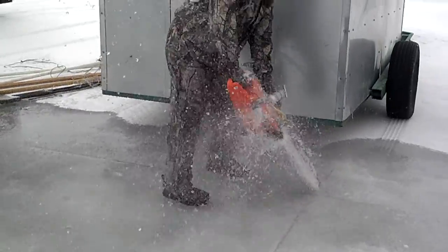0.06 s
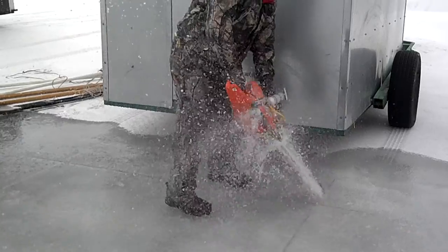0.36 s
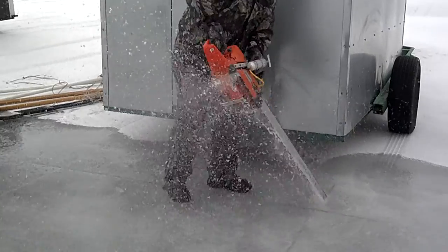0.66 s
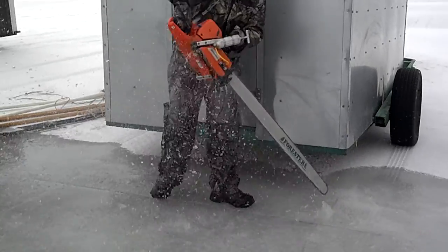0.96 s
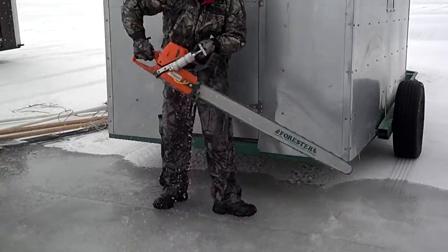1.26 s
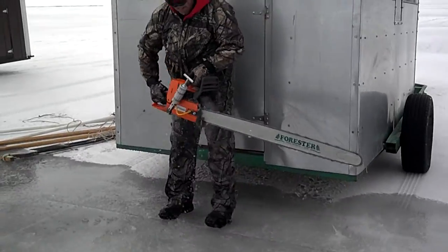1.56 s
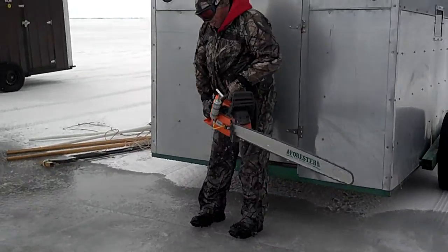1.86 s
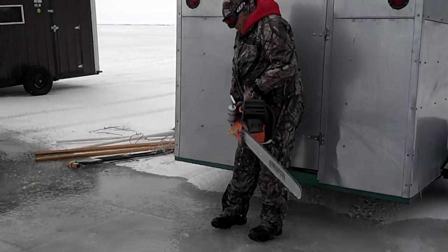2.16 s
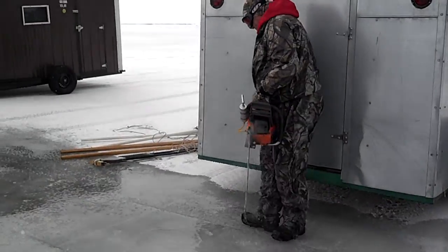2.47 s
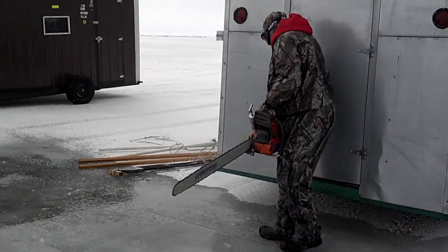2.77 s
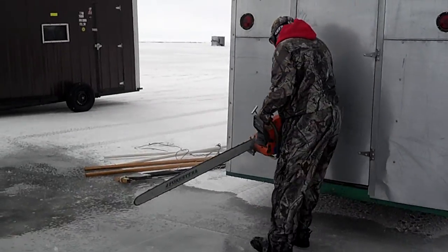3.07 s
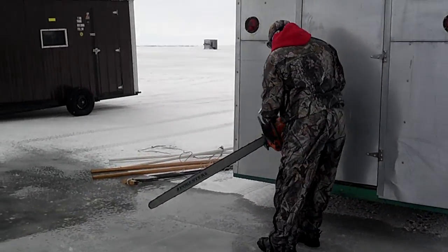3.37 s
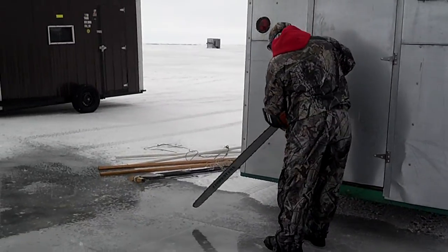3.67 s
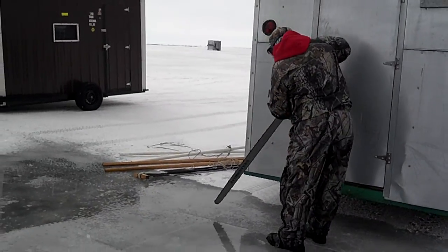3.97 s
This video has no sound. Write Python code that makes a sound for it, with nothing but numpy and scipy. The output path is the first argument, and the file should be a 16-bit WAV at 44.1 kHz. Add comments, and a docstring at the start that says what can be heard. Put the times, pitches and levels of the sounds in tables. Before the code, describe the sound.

A loud two-stroke chainsaw saws through ice, winds down and is revved in short bursts.

```python
"""A two-stroke chainsaw cuts lake ice at full throttle, is lifted out, coasts and is blipped five times.
Each firing cracks through the muffler with a puff of gas, over a clean low drone, and the engine bangs
as the throttle catches. The chain rattles, sings and clinks on its long bar and throws ice chips.
A trailer wall answers, and a pair of combs widens the stereo picture."""
import sys
import numpy as np
from scipy import signal
from scipy.fft import rfft, irfft, next_fast_len
from scipy.io import wavfile
from scipy.ndimage import uniform_filter1d, map_coordinates

SR = 44100
rng = np.random.default_rng(int(sys.argv[2]) if len(sys.argv) > 2 else 0)


def put_to_file(sound):
    """Save the sound as 16-bit audio at rate SR, in the file named by the first command-line argument."""
    columns = np.atleast_2d(sound).T  # one column per channel
    safe = np.clip(columns, -1, 1)
    whole_steps = np.round(safe * 32767)
    wavfile.write(sys.argv[1], SR, whole_steps.astype(np.int16))


N = 176400
TIME = np.arange(N) / SR


def engine_speed():
    """Turns per second: the crank races under throttle and runs down between blips."""
    # crank speed: t/s, f/Hz
    revs = [(0.0, 165.2), (0.14, 163.9), (0.34, 166.5), (0.59, 185.7), (0.65, 188.4), (0.68, 179.8),
            (0.79, 146), (0.99, 97.8), (1.08, 80.5), (1.16, 80.9), (1.25, 109.9), (1.31, 128.9),
            (1.45, 162.1), (1.5, 172), (1.66, 128.9), (1.68, 127.0), (1.8, 164.9), (1.9, 183.6),
            (1.95, 188.9), (1.98, 182.6), (2.08, 158.1), (2.23, 186.8), (2.31, 196.5), (2.33, 194.5),
            (2.54, 145.0), (2.66, 176.1), (2.78, 195.5), (2.81, 190.6), (2.88, 172.5), (3.16, 112.5),
            (3.23, 129.5), (3.36, 166.5), (3.4, 164.7), (3.61, 122.5), (3.71, 105.0), (3.88, 78.5),
            (4.0, 65)]
    return uniform_filter1d(curve(revs), size=900, mode="nearest") * (1 + 0.00084 * wobble(30.0))


def exhaust(speed, bark_hz=114, snarl_hz=195):
    """Firings crack through the muffler, whose nasal honk shifts as the saw is turned; gives tone, gas."""
    # throttle held in the cut: open/s, close/s, level/dB, roughness/0-1, rise/s, rasp/dB, honk/Hz, honk/dB
    cut = [(-0.23, 0.633, -4, 0.12, .01, -38, 1027, -7)]
    # throttle blips: same columns
    blips = [(1.158,1.487,-3.5,0.04,0.084,-2,950,6.5),(1.652,1.95,-2,0.09,0.045,-6,1034,1.5),(2.068,2.309,-1.5,0.15,0.083,0.5,720,-12),(2.535,2.782,-8,0.13,0.029,-4.5,1234,7.5),(3.16,3.325,-3,0.14,0.014,-12,625,-18)]
    # muffler colour nose down in the cut, held up at high revs, held up at low revs: f/Hz, level/dB
    cut_tone = [(300,-106),(495,-73),(535,-48.5),(660,-50.5),(830,-43.5),(1000,-48.5),(1170,-47),(1330,-75),(1500,-53.5),(1800,-60.5),(2300,-54.5),(3350,-55.5),(6000,-76),(12000,-111)]
    snarl_tone = [(60,-100),(350,-68),(430,-63),(540,-52.5),(750,-57),(880,-51),(1120,-50.5),(1320,-60.5),(1520,-54),(1900,-63),(2600,-54.5),(5200,-75),(9000,-109)]
    bark_tone = [(60,-100),(300,-55),(430,-59),(560,-45.5),(700,-44.5),(900,-46.5),(1100,-60.5),(1500,-56.5),(2300,-84),(4000,-53.5),(7000,-72.5)]
    snarl = np.clip((speed - bark_hz) / (snarl_hz - bark_hz), 0, 1)
    effort = rev_gain(speed, db_per_octave=10.5)
    fired, load, rasp = np.zeros((3, N))
    for spells, tones in ((cut, [(cut_tone, 1)]), (blips, [(snarl_tone, snarl), (bark_tone, 1 - snarl)])):
        for opens, closes, db, roughness, rise, rasp_db, honk_hz, honk_db in spells:
            gain, rough = throttle(opens, closes, db, roughness, rise)
            firings = pulses(speed, gain * effort, rough)
            voice = sum(coloured(firings * share, tone) for tone, share in tones)
            fired = fired + voice + amp(honk_db) * resonance(voice, honk_hz, width_hz=110)
            load += gain
            rasp += gain * amp(rasp_db - db)
    fired = fired + idling(speed, effort) + buzz(speed, rasp)
    gas = gas_puffs(speed, load)
    return fired + coasting(speed, load), gas


def throttle(opens, closes, db, roughness, rise, close_s=0.018, stumble_s=.016):
    """Gain and roughness of one spell of firing; it stumbles as the throttle opens and shuts."""
    gate = np.clip((TIME - opens) / rise, 0, 1) * np.exp(-np.maximum(TIME - closes, 0) / close_s)
    stumble = np.exp(-np.abs(TIME - opens) / stumble_s) + np.exp(-np.abs(TIME - closes) / stumble_s)
    return amp(db) * gate, np.clip(roughness * gate + .3 * stumble, 0, 1)


def pulses(speed, gain, rough, half_taps=8):
    """One pulse a turn; roughness scatters size and timing and weakens every other pulse."""
    turns = np.cumsum(speed) / SR
    count = np.arange(1, int(turns[-1]))
    at = np.interp(count, turns, np.arange(N))
    i = at.astype(int)
    size_scatter, time_scatter = rng.standard_normal((N // 100, 2))[:len(count)].T
    uneven = np.maximum(1 + rough[i] * (size_scatter + .5 * (-1) ** count), 0)
    size = gain[i] * SR / np.sqrt(2 * speed[i]) * uneven
    jitter_s = .00007 * 3 ** -octaves(speed)[i] * rough[i] * time_scatter  # looser at low revs
    at = at + jitter_s * SR
    taps = at.astype(int)[:, None] + np.arange(1 - half_taps, half_taps + 1)
    offset = taps - at[:, None]
    click = np.sinc(offset) * np.cos(np.pi * offset / (2 * half_taps)) ** 2  # lands between samples
    return np.bincount(np.clip(taps, 0, N).ravel(), (size[:, None] * click).ravel(), N + 1)[:N]


def idling(speed, effort):
    """Lumpy firing at low revs putters through the muffler."""
    # spells of idle: start/s, end/s, level/dB, roughness/0-1, rise/s
    spells = [(.9,1.22,-1,0.3,0.11),(3.64,3.79,0,0.2,0.13),(3.8,4.1,-7,0.35,0.018)]
    # muffler colour at idle: f/Hz, level/dB
    idle_tone = [(50,-100),(120,-63.5),(320,-54),(500,-60.5),(680,-47),(790,-43.5),(1000,-76),(1480,-72),(1680,-52),(1900,-90),(8000,-85.5)]
    gates = (throttle(*spell) for spell in spells)
    return coloured(sum(pulses(speed, gain * effort, rough) for gain, rough in gates), idle_tone)


def buzz(speed, rasp):
    """Even firing pulses ring one narrow treble resonance: a raspy edge that grows with the revs."""
    gain = rasp * amp(-48) * rev_gain(speed, db_per_octave=12)
    return resonance(pulses(speed, gain, np.zeros(N)), hz=3400, width_hz=150)


def gas_puffs(speed, load, decay_per_turn=0.24):
    """Exhaust gas hisses under throttle, with a slight puff on each turn."""
    # gas colour: f/Hz, level/dB
    gas_tone = [(60,-112),(400,-80),(750,-70),(2000,-69),(3400,-63),(4700,-66),(5500,-72),(6600,-73),(8000,-77),(12000,-79),(15000,-72)]
    puffs = unit(np.exp(-decay_per_turn * (np.cumsum(speed) / SR % 1)))
    return coloured(hiss() * puffs * load * rev_gain(speed, db_per_octave=12.5), gas_tone)


def coasting(speed, load):
    """Soft pumping pulses come forward as the load drops."""
    # muffler colour while coasting: f/Hz, level/dB
    coast_tone = [(200,-79),(310,-70),(430,-72.5),(600,-59.5),(750,-57.5),(950,-65.5),(1600,-64.5),(2300,-58.5),(3200,-66),(7000,-114)]
    gain = np.clip(1 - load, 0, 1) * rev_gain(speed, db_per_octave=6.5)
    return coloured(pulses(speed, gain, rough=np.full(N, .14)), coast_tone)


def drone(speed):
    """The engine's two lowest orders, clean; they swell and fade as the saw is turned."""
    # fader rides of the first and second order: t/s, level/dB
    first = [(0,-30.5),(.62,-28),(.68,-44),(.9,-56),(1.09,-75),(1.2,-51),(1.35,-34.5),(1.52,-44),(1.66,-39),(1.9,-33),(2.04,-38),(2.55,-32.5),(2.68,-40),(2.9,-31.5),(3.14,-48),(3.33,-24.5),(3.39,-27),(3.54,-44.5),(3.72,-52),(4,-86)]
    second = [(0,-32),(.66,-32.5),(.9,-46.5),(1.09,-62),(1.25,-38),(1.52,-33.5),(1.66,-38),(1.8,-35.5),(1.93,-38),(1.99,-29),(2.07,-29.5),(2.15,-41),(2.29,-39),(2.37,-30.5),(2.54,-33),(2.67,-44.5),(2.82,-32),(3.14,-42),(3.35,-44.5),(3.52,-34.5),(4,-48.5)]
    phase = 2 * np.pi * np.cumsum(speed) / SR
    return np.sqrt(2) * (amp(curve(first)) * np.sin(phase) + amp(curve(second)) * np.sin(2 * phase))


def bangs():
    """The engine bangs as the throttle catches."""
    # bang cues: t/s, level/dB
    cues = [(1.6736,-17.5),(2.0828,-15),(2.5406,-18)]
    # bang colour: f/Hz, level/dB
    bang_tone = [(60,-17),(200,8),(1000,6.5),(2000,-17),(4000,8),(6000,-2),(15000,-18)]
    return bursts(cues, bang_tone, t60_s=0.04)


def chain_rattle(speed, shake_depth=0.028, link_scatter_db=1.46, drift_db=0.69):
    """Links clatter round the bar, shaken once a turn."""
    # fader ride of the rattle: t/s, level/dB
    ride = [(0,2),(.62,4),(.78,2.5),(1.08,-5),(1.2,-0.5),(1.42,5.5),(1.65,-0.5),(1.95,6),(2.3,3),(2.5,3),(2.8,4.5),(3.14,-3),(3.3,2.5),(3.55,-3.5),(3.8,-7),(4,-8)]
    # rattle colour: f/Hz, level/dB
    rattle_tone = [(30,-108),(100,-90),(250,-82),(450,-77),(700,-70),(1600,-66),(2300,-65),(3200,-69),(4000,-65),(4700,-66),(5600,-73),(8000,-75),(12000,-77),(14000,-71),(15700,-69)]
    phase = 2 * np.pi * np.cumsum(speed) / SR
    clatter = unit((1 + shake_depth * np.cos(phase)) * amp(link_scatter_db * wobble(770)))
    return amp(curve(ride) + drift_db * wobble(24.56)) * coloured(hiss() * clatter, rattle_tone)


def chain_song(waver_hz=32, flutter_db=3):
    """The chain sings on the bar: unsteady metallic glides, up under power and down as it coasts."""
    # glides: start/s, end/s, from/Hz, to/Hz, level/dB
    glides = [(.42,.57,3340,3460,-29),(.67,.81,2700,2200,-27.5),(.85,1.02,2340,2200,-30),(1.3,1.51,3220,3440,-31),(1.98,2.1,2700,2370,-29.5),(2.16,2.3,3320,3500,-26),(2.33,2.54,2720,2130,-28.5),(3.41,3.57,2680,2290,-34)]
    waver, flutter = waver_hz * wobble(120), amp(flutter_db * wobble(60))
    song = np.zeros(N)
    for starts, ends, from_hz, to_hz, db in glides:
        progress = np.clip((TIME - starts) / (ends - starts), 0, 1)
        hz = from_hz + (to_hz - from_hz) * progress + waver
        swell = np.sqrt(np.abs(np.sin(np.pi * progress)))
        song += amp(db) * swell * np.sin(2 * np.pi * np.cumsum(hz) / SR)
    return song * flutter


def chain_clinks():
    """The slack chain clinks brightly on the bar."""
    # clink cues: t/s, level/dB
    cues = [(1.1124,-22),(1.1388,-22),(1.1762,-25)]
    # clink colour: f/Hz, level/dB
    clink_tone = [(500,-23),(4000,-4),(11000,-12),(14000,10),(15700,10)]
    return bursts(cues, clink_tone, t60_s=0.039)


def ice_chips(per_second=670, stop_s=0.55):
    """Ice chips patter down at a steady rate and stop just before the cut ends."""
    # chip colour: f/Hz, level/dB
    chip_tone = [(800,-30),(3000,6),(10000,9),(15000,-25)]
    landings = (rng.random((2, N)) < per_second / SR) & (TIME <= stop_s)
    hits = landings * rng.standard_normal((2, N))
    return amp(-44.5) * np.sqrt(SR / per_second) * coloured(hits, chip_tone)


def wall(x, t60_s=.06, size=8192):
    """Short scatter off the trailer and the ice along two paths; the first carries the direct sound too."""
    t = np.arange(size) / SR
    tail = rng.standard_normal((2, size)) * amp(-60 * t / t60_s)
    paths = rfft(amp(4) * tail / np.linalg.norm(tail, axis=1, keepdims=True)) + [[1], [0]]
    paths /= np.sqrt(uniform_filter1d(np.abs(paths) ** 2, size=30, axis=1))  # even out the colour
    return signal.fftconvolve(x, irfft(paths)[:, :size // 2], axes=1)[:, :N]


def bursts(cues, tone, t60_s):
    """Short noise cracks that start at once and die quickly."""
    envelope = sum((TIME >= at) * amp(db - 60 * np.maximum(TIME - at, 0) / t60_s) for at, db in cues)
    return coloured(envelope * rng.standard_normal((2, N)), tone)


def octaves(speed):
    """Speed in octaves over its median."""
    return np.log2(speed / np.median(speed))


def rev_gain(speed, db_per_octave):
    """Gain that rises with the revs, 1 at the median speed."""
    return amp(db_per_octave * octaves(speed))


def amp(db):
    """Decibels to gain."""
    return 10 ** (np.asarray(db) / 20)


def unit(x):
    """Scale to rms 1."""
    return x / np.sqrt(np.mean(x ** 2) + 1e-20)


def along(points, hz):
    """Read (f/Hz, value) points on a log axis."""
    f, v = np.transpose(points)
    return np.interp(np.log(hz + 1), np.log(f + 1), v)


def curve(rows):
    """(t/s, value) points to one value per sample."""
    return np.interp(TIME, *np.transpose(rows))


def wobble(rate):
    """A smooth random curve, rate knots a second."""
    return map_coordinates(rng.standard_normal(int(N * rate / SR) + 4), [TIME * rate])


def hiss():
    """Two unrelated noises of 0 dB per Hz."""
    return rng.standard_normal((2, N)) * np.sqrt(SR / 2)


def filtered(x, response):
    """x through a response given as a function of frequency."""
    size = next_fast_len(N + 8192)
    return irfft(rfft(x, size) * response(np.fft.rfftfreq(size, 1 / SR)), size)[..., :N]


def resonance(x, hz, width_hz):
    """x through one resonance of gain 1."""
    return filtered(x, lambda f: 1j * f * width_hz / (hz ** 2 - f * f + 1j * f * width_hz))


def coloured(x, points, size=4096):
    """Each row of x through a minimum-phase EQ of (f/Hz, level/dB) points."""
    cepstrum = irfft(np.log(amp(along(points, np.fft.rfftfreq(size, 1 / SR)))))
    cepstrum[1:size // 2] *= 2
    cepstrum[size // 2 + 1:] = 0
    impulse = irfft(np.exp(rfft(cepstrum)))
    return signal.fftconvolve(np.atleast_2d(x), impulse[None], axes=1)[:, :N]


def scene():
    """The saw stands a little to the right; its body is narrow, its treble diffuse."""
    # stereo width, side against mid: f/Hz, level/dB
    width = [(40,8),(160,-11),(330,-6),(650,-20.5),(1100,-10.5),(1700,9.5),(2300,-1),(3500,1.5),(5000,-1.5),(15000,-1)]
    # direct sound in the side signal, leaning right: f/Hz, share/0-1
    lean = [(300,0.014),(1200,0.063),(1900,0.88),(3500,0.46),(8000,0.051)]
    speed = engine_speed()
    tone, gas = exhaust(speed)
    noise = gas + chain_rattle(speed) + ice_chips() + bangs() + chain_clinks()
    reflected, low = wall(tone + chain_song()), drone(speed)
    mid = reflected[0] + low + noise[0]
    diffuse = noise[1] + reflected[1] + filtered(low, lambda hz: 1j)  # drone a quarter cycle ahead
    side = filtered(diffuse, lambda hz: np.sqrt(1 - along(lean, hz) ** 2))
    side -= filtered(mid, lambda hz: along(lean, hz))
    side = filtered(side, lambda hz: amp(along(width, hz)))
    return np.array([mid + side, mid - side])


def record(dry):
    """A stereo widener's two combs give alternate treble bands to mid and side; then the top is cut."""
    comb_hz, top_hz = 2756.25, 15800
    angle = lambda hz: np.arctan(np.tan(np.pi * hz / comb_hz) ** 2)
    mid = filtered((dry[0] + dry[1]) / 2, lambda hz: np.where(hz < comb_hz / 2, 1, np.sin(angle(hz))))
    side = filtered((dry[0] - dry[1]) / 2, lambda hz: np.cos(angle(hz)))
    return filtered(np.array([mid + side, mid - side]), lambda hz: hz < top_hz)


dry = scene()
out = record(dry)
put_to_file(out)
```